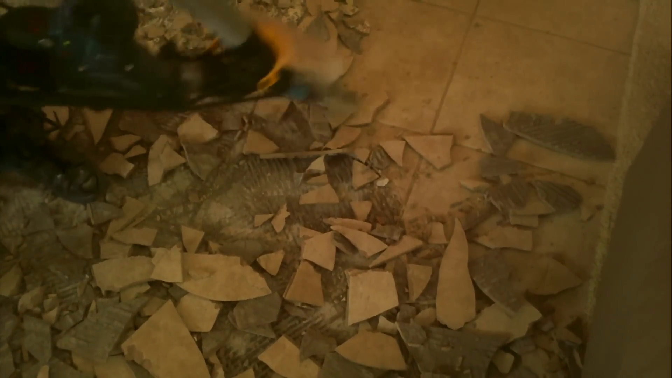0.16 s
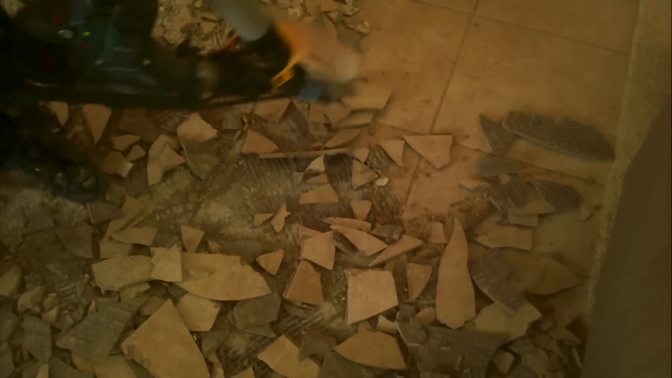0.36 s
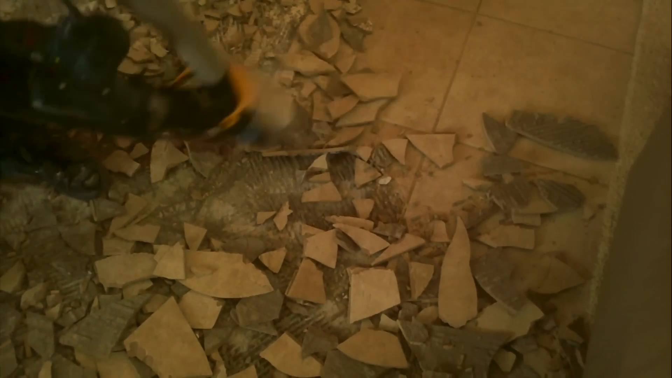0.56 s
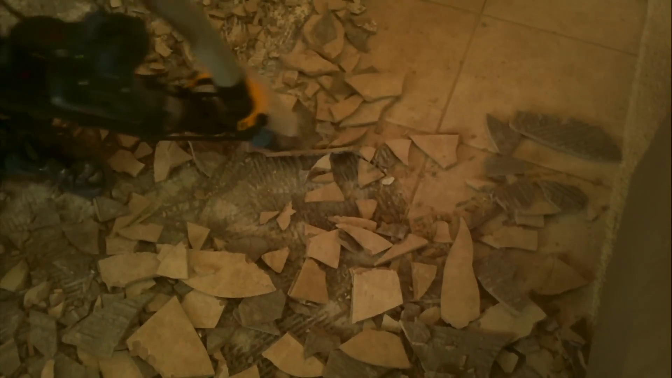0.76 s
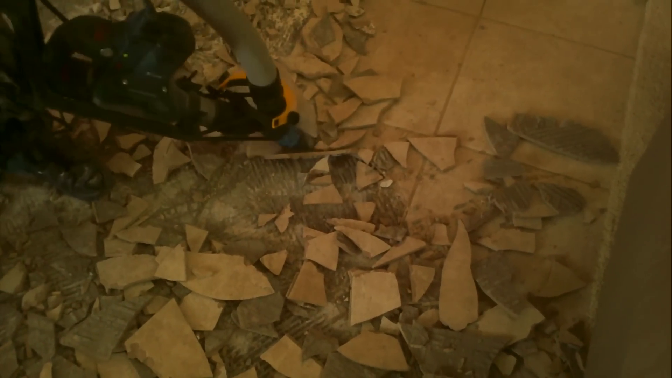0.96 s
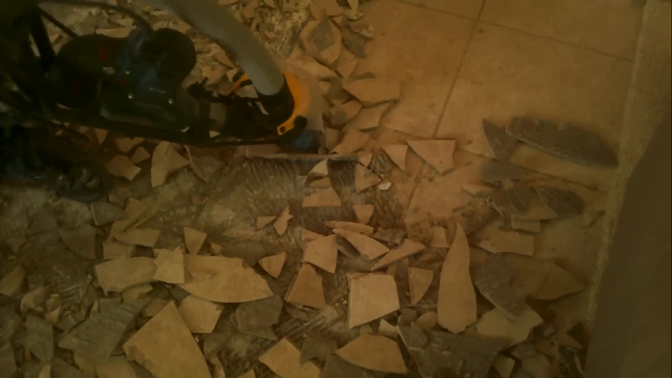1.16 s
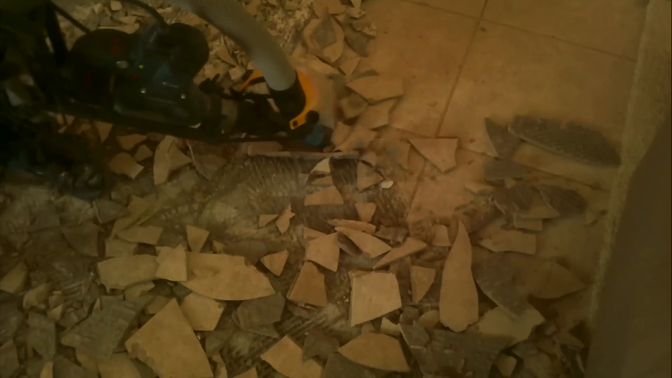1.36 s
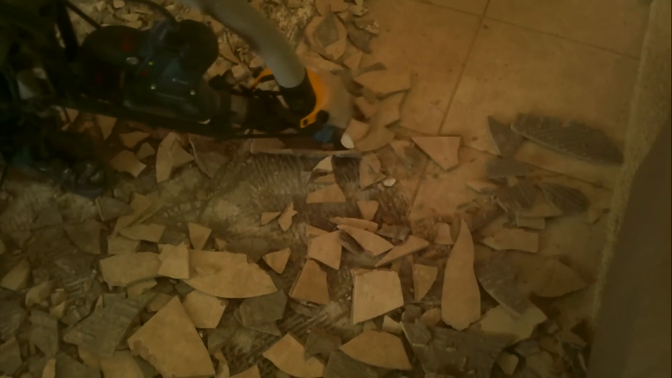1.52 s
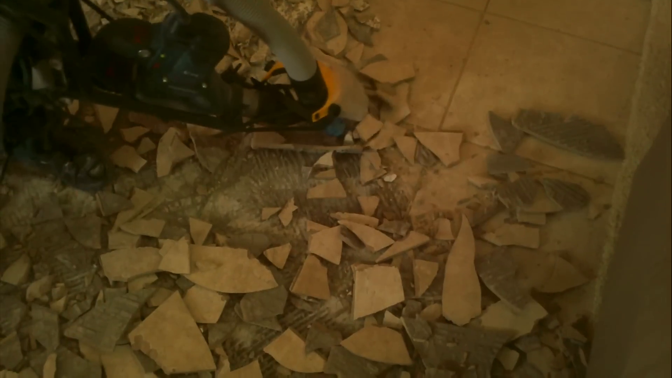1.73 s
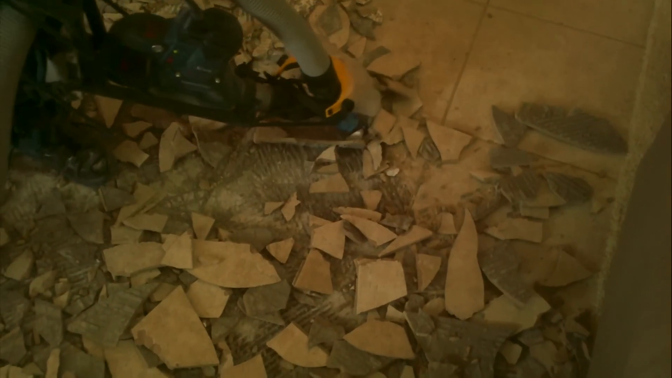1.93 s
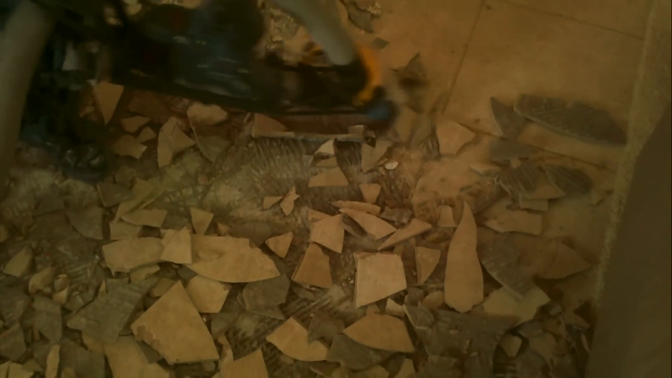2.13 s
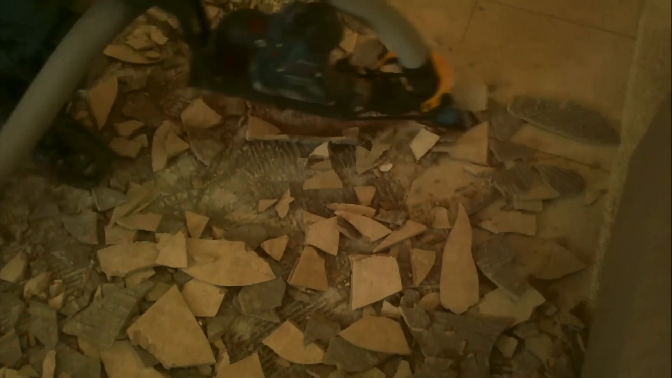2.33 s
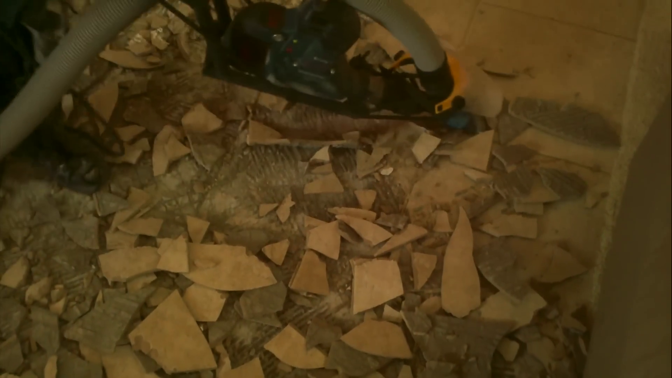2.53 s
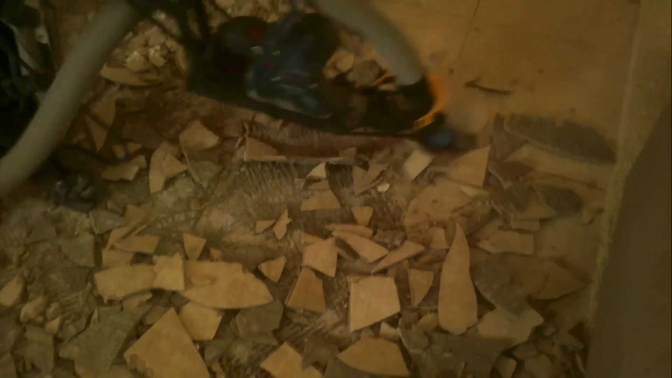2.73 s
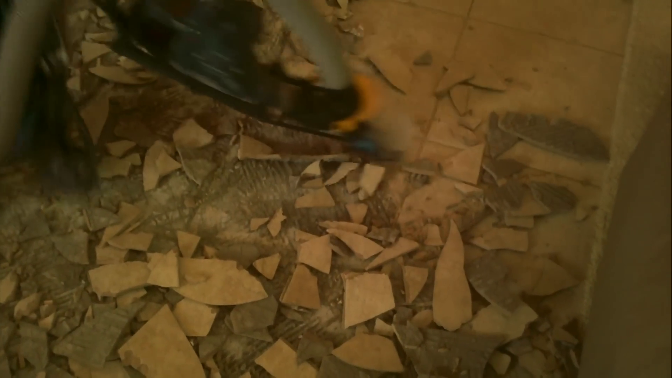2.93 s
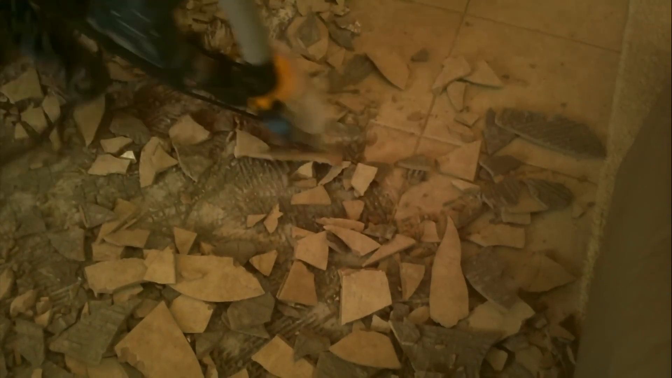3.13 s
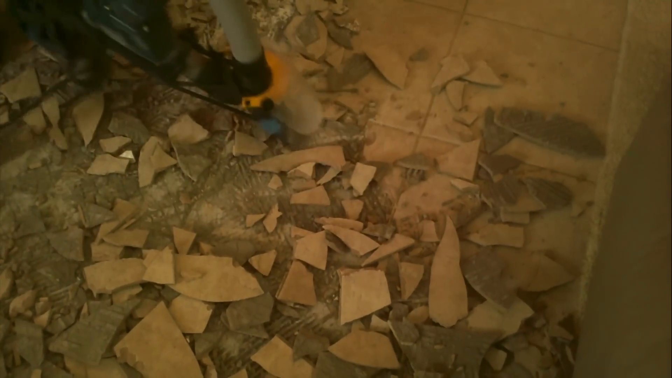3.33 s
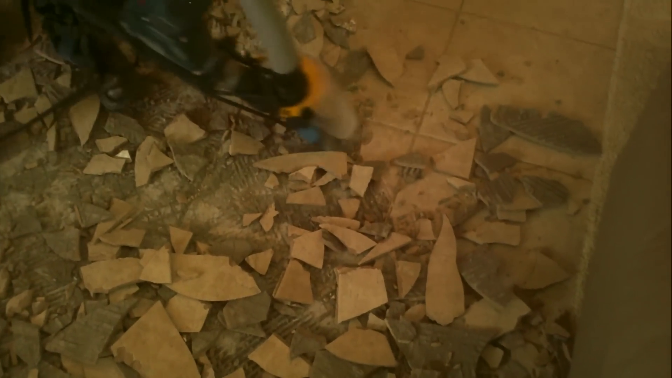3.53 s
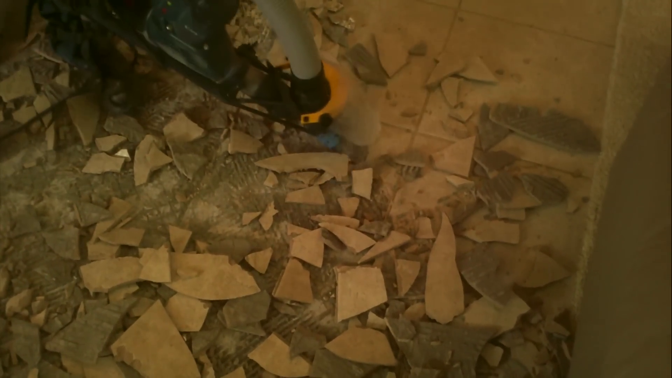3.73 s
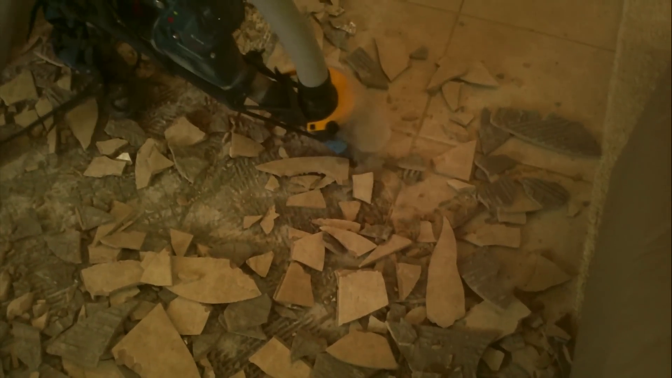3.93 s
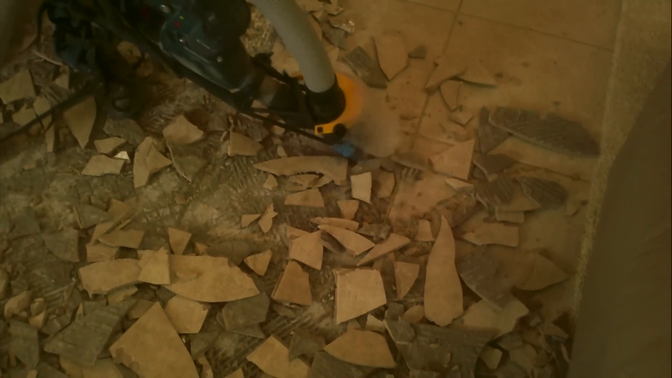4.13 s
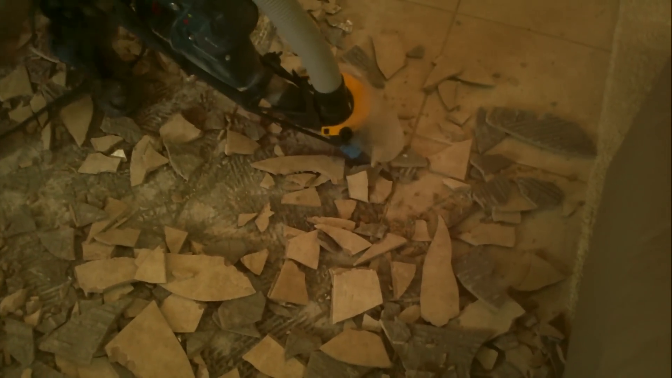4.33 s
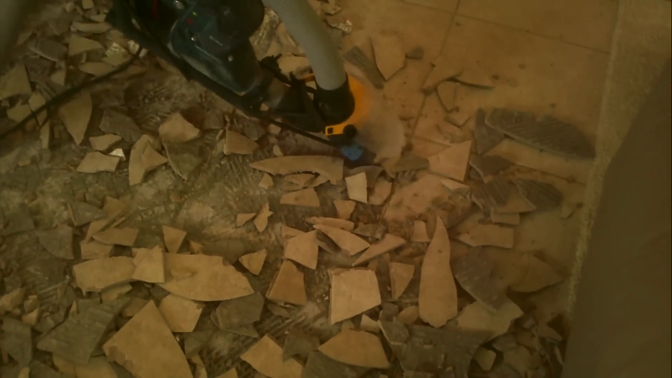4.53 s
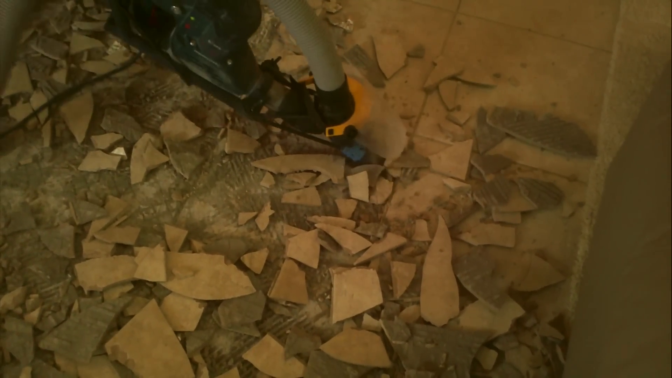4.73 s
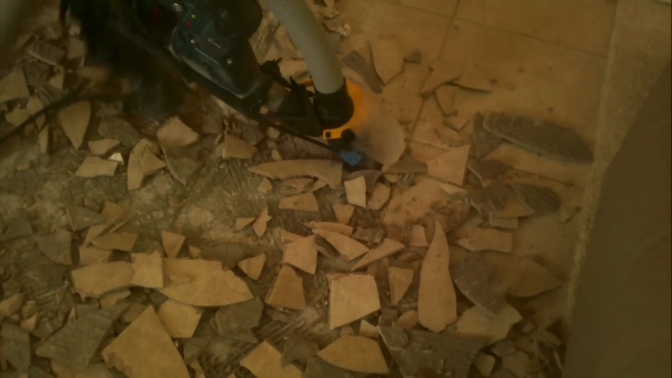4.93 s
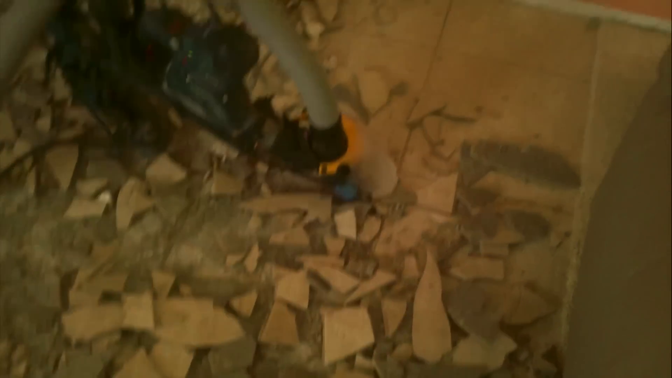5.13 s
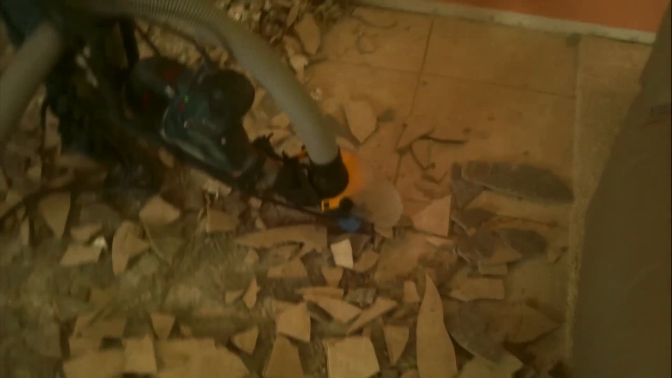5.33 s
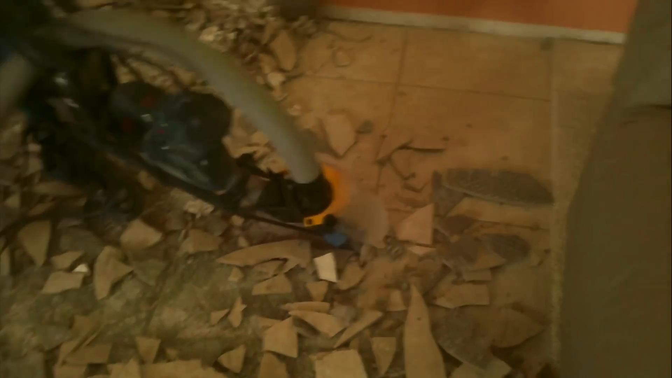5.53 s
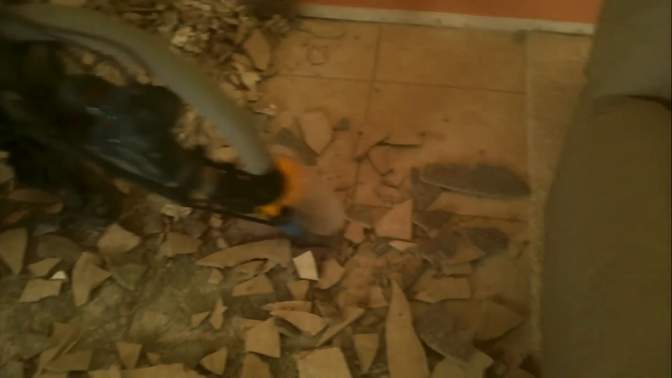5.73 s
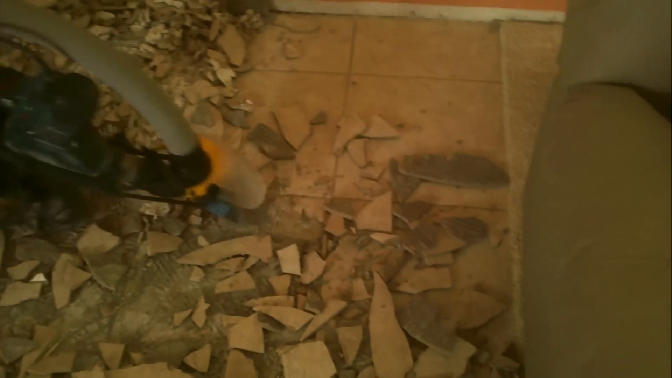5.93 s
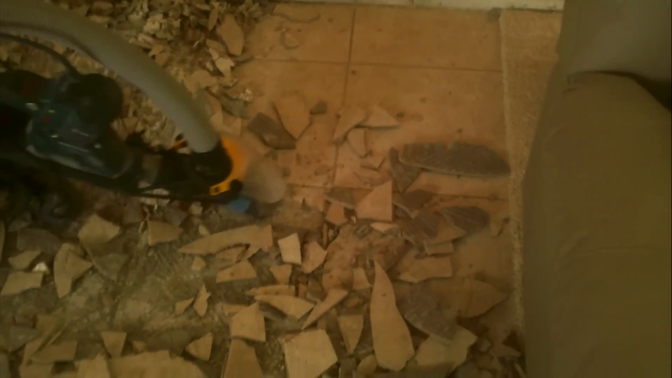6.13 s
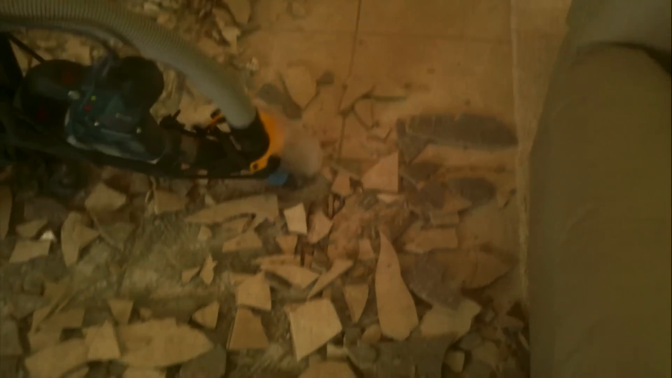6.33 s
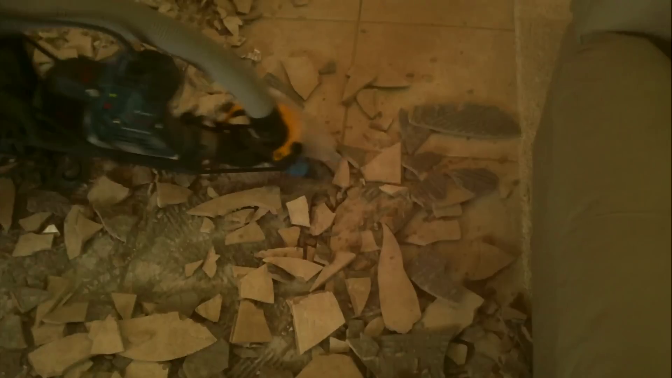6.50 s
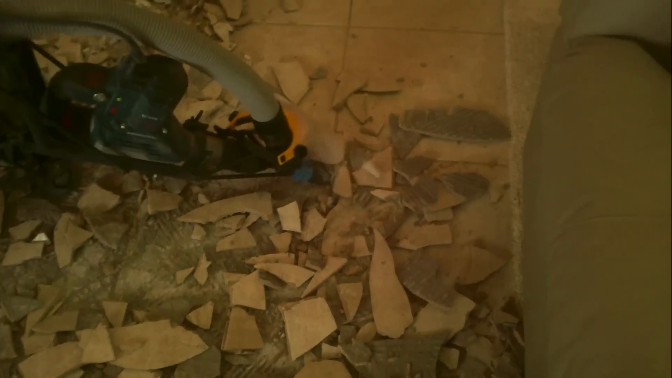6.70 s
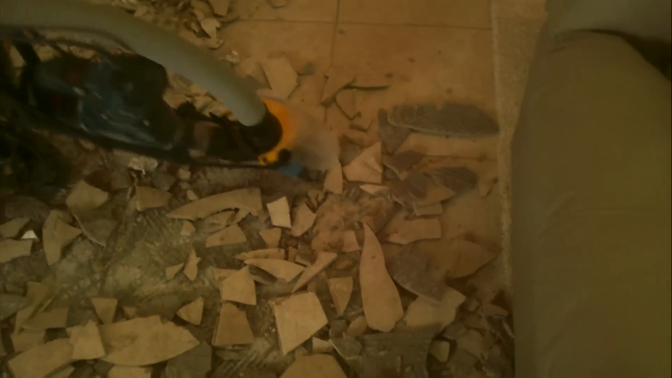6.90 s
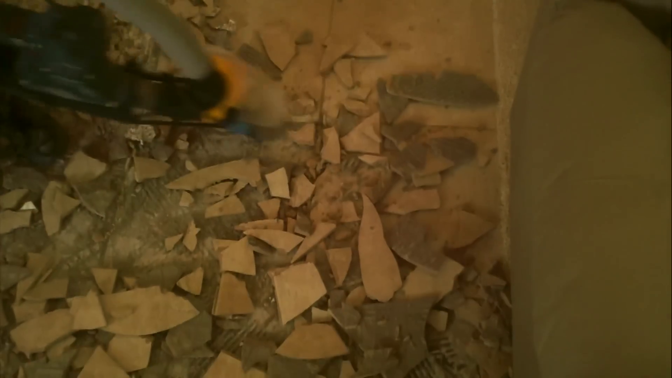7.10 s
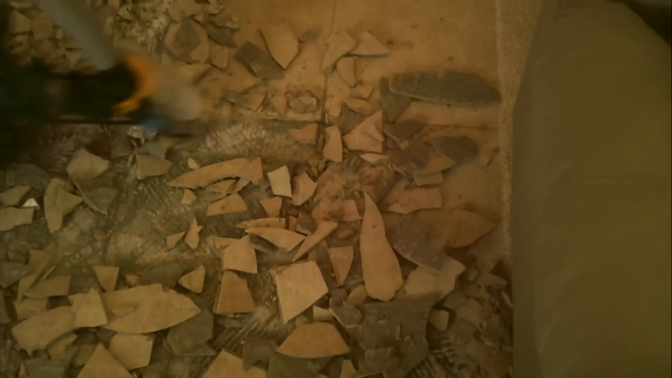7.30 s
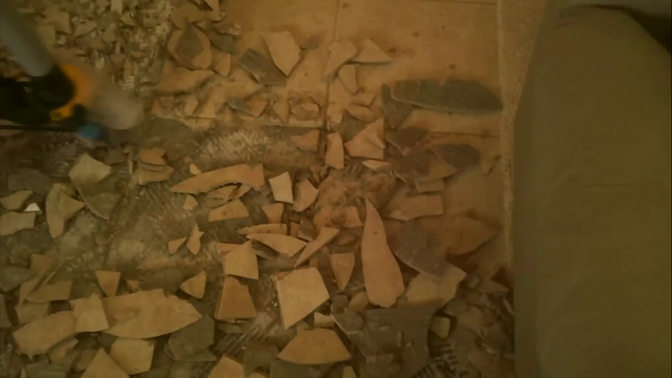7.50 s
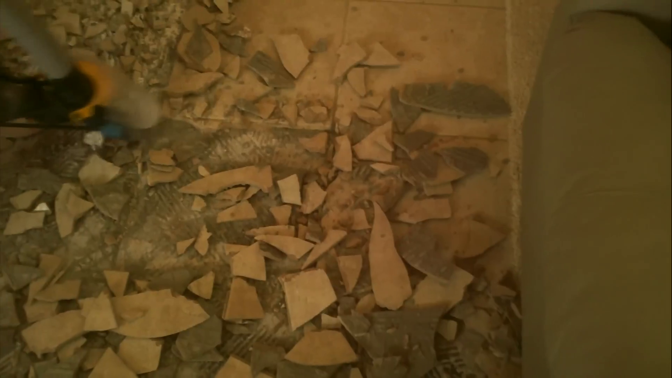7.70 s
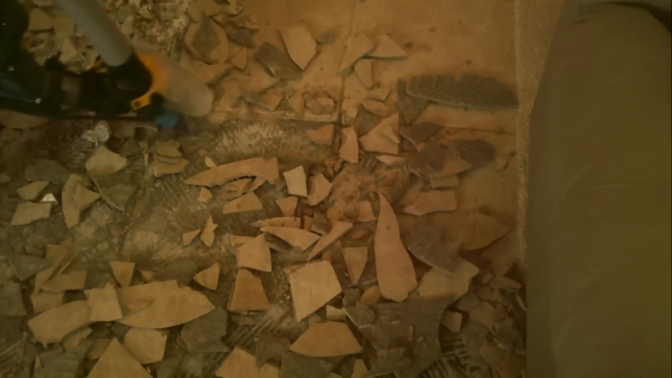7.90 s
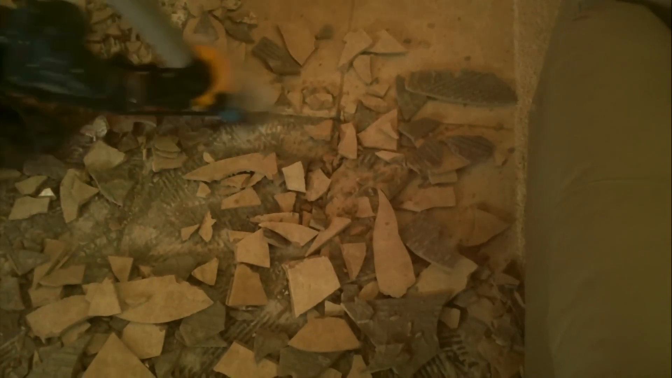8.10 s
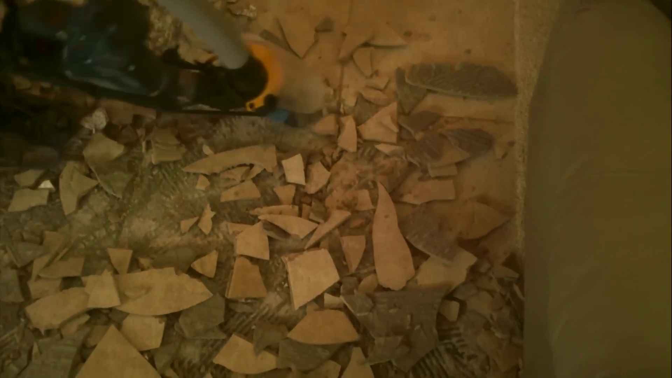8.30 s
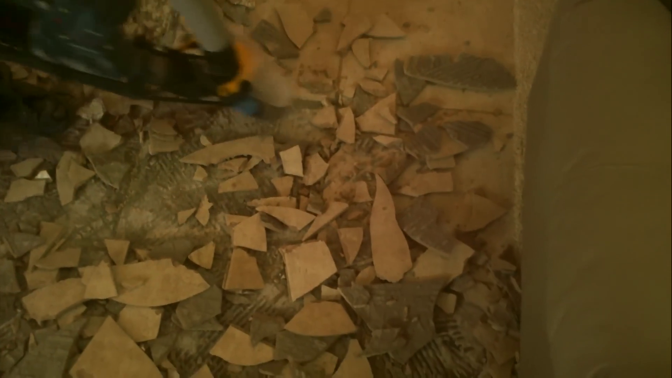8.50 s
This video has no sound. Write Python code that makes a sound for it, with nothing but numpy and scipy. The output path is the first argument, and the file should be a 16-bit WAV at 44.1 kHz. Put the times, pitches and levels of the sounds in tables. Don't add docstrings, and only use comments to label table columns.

```python
import sys
import numpy as np
from scipy import signal
from scipy.io import wavfile
from scipy.ndimage import uniform_filter1d

SR = 44100
rng = np.random.default_rng(int(sys.argv[2]) if len(sys.argv) > 2 else 0)


def volts_from_db(level):
    exponent = np.asarray(level, float) / 20
    return 10 ** exponent


def master_out(mix):
    frames = np.transpose(np.atleast_2d(mix))
    ceiling = np.clip(frames, -1, 1)
    pcm = np.round(ceiling * 32767).astype(np.int16)
    wavfile.write(sys.argv[1], SR, pcm)


N = 377055

# (first blow [s], end [s])
BURSTS = [
    (.8005, 2.3),
    (3.3695, 4.78),
    (5.0235, 5.76),
    (6.1235, 7.06),
    (7.8025, 8.4),
]
# (first blow [dB], rise [s], held level [dB], lifted at [s])
STROKES = [
    (-19, 0.13, -14, 2.148),
    (-19.5, .17, -13.6, 4.635),
    (-15.5, 0.35, -13.5, 5.625),
    (-17.5, 0.12, -13.5, 6.905),
    (-13.5, .1, -14, 8.215),
]
# (time [s], half length [s], shank [dB], free ring [dB], force [dB])
SKIDS = [(1.0, 0.066, 0, 2, 0.2), (1.413, 0.044, 5, 7, -.4), (1.64, 0.087, 4, -10, 0),
         (1.9, 0.13, 1.5, -7, 0.2), (2.1, 0.025, -1, 0, 3), (3.44, 0.11, 6, 8.5, -.3),
         (3.85, .15, -2.0, -5.5, -0.5), (4.242, .06, 0, 6.5, -0.7), (4.6, .06, 2.5, -2.5, 1.5),
         (5.11, 0.12, 1, 7, 0), (5.39, 0.087, -8, 2.5, .4), (6.68, .06, -2, 0, 0.2),
         (6.803, 0.011, 1, -3.0, -2), (8.085, .015, -6, .5, -1), (8.15, 0.043, 6, 0.5, .4),
         (8.236, 0.026, 12.5, 4.0, -0.7)]


def rms_one(x):
    return x / np.sqrt(np.mean(x ** 2) + 1e-20)


def in_time(tables):
    rows = np.concatenate(tables)
    return [np.interp(np.arange(N) / SR, rows[:, 0], column) for column in rows.T[1:]]


def during(spans):
    t = np.arange(N) / SR
    return sum((t >= a) & (t <= b) for a, b in spans)


def passing_db(rows, column):
    t = np.arange(N) / SR
    return sum(row[column] * np.exp(-((t - row[0]) / row[1]) ** 2) for row in rows)


def drift(rate_hz):
    r = np.exp(-80 * np.pi * rate_hz / SR)
    white = rng.standard_normal(N // 40 + 2002)
    slow = signal.lfilter([1], [1, -2 * r, r * r], white)[2000:]
    return np.interp(np.arange(N) / 40, np.arange(len(slow)), rms_one(slow))


def ring(x, hz, t60_s):
    r, w = volts_from_db(-60 / (t60_s * SR)), 2 * np.pi * hz / SR
    return signal.lfilter([0, np.sin(w)], [1, -2 * r * np.cos(w), r * r], x + 1e-18)


def tone(hz, width_hz):
    phase = 2 * np.pi * np.cumsum(hz + width_hz * drift(23.5)) / SR
    return np.sqrt(2) * np.sin(phase)


def coloured(spectrum, patchy_db):
    out, white = 0, rng.standard_normal((2, N))
    edges_hz = 70 * 2 ** np.arange(0, 8.1, 1 / 4)
    hz, level_db = np.transpose(spectrum)
    for k, (low, high) in enumerate(zip(edges_hz, edges_hz[1:])):
        sos = signal.butter(2, [low, high], "band", fs=SR, output="sos")
        band_db = np.interp(np.log(low * high) / 2, np.log(hz), level_db) + patchy_db * drift(5.2)
        out = out + signal.sosfilt(sos, white[k % 2]) * volts_from_db(band_db)
    return rms_one(out)


def dying(clicks, tau_s):
    return signal.lfilter([1], [1, -np.exp(-1 / (tau_s * SR))], clicks + 1e-18)


def hammer():
    # (time [s], push as floor shock [dB], depth as contact re ring [dB])
    tip = [
        [(.81, -57, -4), (.97, -22, -7), (1.18, -20.5, -8), (1.26, -31, -2), (1.33, -23, -7.5),
         (1.65, -26.5, -8), (2.1, -18, -5.5), (2.17, -60, -5.5)],
        [(3.38, -58, -7), (3.52, -19.5, -8), (3.66, -33.5, -8.5), (3.88, -18.5, -5.5), (3.98, -24, -7),
         (4.2, -25, -9.5), (4.62, -25.5, -6), (4.7, -58, -15)],
        [(5.03, -30, -12), (5.1, -29, -3), (5.39, -21, -8), (5.6, -23.5, -8), (5.67, -50, -5)],
        [(6.13, -64, -9), (6.22, -24.5, -6.5), (6.69, -19.5, -7.5), (6.77, -33, -5), (6.81, -45, -7),
         (6.93, -57, -12)],
        [(7.81, -33, -4), (7.84, -18.5, -3.5), (8.0, -14.5, -8), (8.07, -48, -7), (8.14, -33, -1),
         (8.25, -40, -10), (8.29, -60, -13)],
    ]
    # (frequency [Hz], level [dB], t60 [s])
    chisel = [(8682, -2.5, 0.016), (8840, -3.5, 0.03), (9164, -2, 0.021), (9326, -5, 0.0071),
              (8433, -4.5, 0.018)]
    contact = [(6354, -7, 0.052), (7120, -4, 0.0078), (7636, 1, 0.014), (8090, 1.5, 0.011),
               (5950, -12, 0.11)]
    shank = [(10177, -3, .011), (10645, -3, 0.0066), (11660, -13.5, 0.019), (12020, -9, 0.03)]
    overdrive, knee_db = 1.64, -17

    ring_db, (shock_db, contact_db) = stroke_db(), in_time(tip)
    depth_db, push_db = contact_db + 7, shock_db + 26
    shank_db = -6.5 + 0.66 * depth_db + passing_db(SKIDS, column=2) + 1.8 * drift(7.9)
    free_db = -6 - 0.048 * depth_db - 0.033 * push_db + passing_db(SKIDS, column=3) + 1.13 * drift(4.9)
    shock_db = shock_db + 1.8 * drift(29.0)
    on = during(BURSTS)
    force = on * volts_from_db(ring_db + overdrive * np.maximum(ring_db - knee_db, 0))

    clicks = blows(jitter_s=.0012, spread_db=3.5)
    bite = np.clip((shock_db + 37) / 25, 0, 1)
    rebounds = .45 * bite * np.roll(clicks, round(.0101 * SR))
    rattle = dying(clicks + rebounds, .009) + .19 + .22 * bite

    steel = 0.85 * steel_modes(rattle, chisel)
    steel = steel + volts_from_db(free_db + 1.5) * bell(rattle)
    steel = steel + volts_from_db(contact_db + 1.5) * steel_modes(rattle, contact)
    steel = steel + volts_from_db(shank_db - 1.35) * steel_modes(rattle, shank)
    sound = force * (steel + breaking_tile(rattle, push_db)) + loose_tile(rattle)
    return sound, jolts(clicks, on * volts_from_db(shock_db - 3))


def stroke_db():
    fade_db_per_s2, flicker_db = 760, 0.43
    t, out = np.arange(N) / SR, np.zeros(N)
    for (a, b), (first_db, rise_s, held_db, lift_s) in zip(BURSTS, STROKES):
        level_db = np.interp(t, [a, a + rise_s], [first_db, held_db])
        level_db = level_db - fade_db_per_s2 * np.maximum(t - lift_s, 0) ** 2
        out = np.where(t >= a, level_db, out)
    return out + passing_db(SKIDS, column=4) + flicker_db * drift(6.1)


def blows(jitter_s, spread_db):
    blows_per_s = [48.85, 49.64, 49.51, 49.16, 49.9]
    first_blow_spreads, idling_db_per_s = 0.31, 44
    clicks = np.zeros(N)
    for (a, b), rate, (_, _, _, lift_s) in zip(BURSTS, blows_per_s, STROKES):
        at_s = np.arange(a, b, 1 / rate) + .001
        luck = rng.standard_normal((100, 2))[:len(at_s)]
        luck[0] = 0, first_blow_spreads
        force_db = spread_db * luck[:, 1] - idling_db_per_s * np.maximum(at_s - lift_s, 0)
        clicks[((at_s + jitter_s * luck[:, 0]) * SR).astype(int)] = volts_from_db(force_db)
    return clicks


def steel_modes(rattle, modes):
    out = 0
    for hz, db, t60_s in modes:
        level = volts_from_db(db + 2.37 * drift(3.45)) / np.sqrt(t60_s)
        out = out + level * ring(rattle * rng.standard_normal(N), hz, t60_s)
    return rms_one(out)


def bell(rattle):
    bell_hz, t60_s, wander_hz = 8935, .045, 38
    kicks = rattle * (rng.standard_normal(N) + 1j * rng.standard_normal(N))
    envelope = signal.lfilter([1], [1, -volts_from_db(-60 / (t60_s * SR))], kicks)
    phase = 2 * np.pi * np.cumsum(bell_hz + wander_hz * drift(4)) / SR
    return rms_one(np.real(envelope * np.exp(1j * phase)))


def breaking_tile(rattle, push_db):
    # (frequency [Hz], density [dB per Hz])
    spectrum = [(120, -67), (200, -28.5), (1440, -13), (1900, -10), (4990, -9), (6810, -8), (8800, 1),
                (9640, -12), (15800, -10.5)]
    level = volts_from_db(-4.5 + 0.019 * np.minimum(push_db, 0))
    return level * rms_one(rattle) * coloured(spectrum, patchy_db=0.9)


def loose_tile(rattle):
    # (from [s], to [s], frequency [Hz], level [dB], t60 [s])
    singing = [
        (0.897, 1.0, 1870, -28.5, 0.11),
        (1.08, 1.332, 3500, -25, 0.086),
        (1.55, 1.734, 1940, -25, 0.064),
        (1.82, 1.98, 6000, -24, 0.1),
        (2.034, 2.09, 1530, -23, 0.031),
        (4.287, 4.553, 3470, -24.5, 0.055),
        (5.27, 5.33, 4520, -27, .06),
        (5.33, 5.37, 2110, -12.5, 0.022),
    ]
    noise, out = rattle * rng.standard_normal(N), 0
    for a, b, hz, db, t60_s in singing:
        gate = uniform_filter1d(1. * during([(a, b)]), size=1500)
        out = out + volts_from_db(db - 2.0) * rms_one(ring(noise, hz, t60_s)) * gate
    return out


def jolts(clicks, shock):
    # (time [s], peak [dB], direction [+1/-1])
    heavy_blows = [(0.985, 3, 1), (1.091, -2, 1), (1.314, -4, 1), (1.398, -4, 1), (1.557, -3, 1),
                   (1.639, 0, -1), (1.738, 5, 1), (1.758, -4, 1), (2.016, -1, 1), (2.114, 3, -1),
                   (3.512, -1, 1), (3.596, -1, 1), (3.74, -1, 1), (3.883, -7, 1), (3.924, 4, -1),
                   (3.965, -1, 1), (4.329, 2, 1), (5.306, 2, 1), (5.369, 4.5, -1), (5.517, 1, -1),
                   (5.58, 1, -1), (6.283, 1, 1), (6.348, -1, 1), (6.429, 2, -1), (6.454, 5, 1),
                   (6.574, -7, 1), (6.698, -3, 1), (6.759, 0, 1), (7.844, 2, 1), (7.942, 0, 1)]
    forward_share = 0.95
    direction = np.sign(forward_share - rng.random(N))
    pushes = 3.5 * shock * np.sqrt(clicks) * rng.uniform(0.33, 1.7, N) * direction
    for s, db, way in heavy_blows:
        pushes[round((s - .009) * SR):round((s + .009) * SR)] = 0
        pushes[round(s * SR)] = volts_from_db(db - 2.5) * np.sign(way)
    lag_s, point = np.arange(-300, 301) / SR, rng.random(N)
    pointed = signal.fftconvolve(pushes * point, 1.67 * np.exp(-np.abs(lag_s) / 0.00011), "same")
    blunt = signal.fftconvolve(pushes * (1 - point), 0.37 * np.exp(-np.abs(lag_s) / 0.0008), "same")
    rumble = (dying(clicks, 0.0024) + 0.12) * rng.standard_normal(N)
    rumble = rms_one(signal.sosfilt(signal.butter(1, 70, fs=SR, output="sos"), rumble))
    return 0.57 * shock * rumble + pointed + blunt


def motor():
    # (heard from [s], to [s], fastest at [s], overshoot [Hz])
    races = [
        (0, .9, -1.0, 0.0),
        (2.2, 3.4, 2.3, 372),
        (4.66, 5.05, 4.78, 328),
        (5.68, 6.14, 5.79, 292),
        (6.92, 7.82, 7.02, 278),
        (8.2, 8.55, 8.34, 128),
    ]
    # (time [s], whine level [dB], housing level [dB])
    turn = [(0, -42, -40), (.25, -31.5, -30), (.45, -37, -38), (.85, -36, -38), (2.3, -35, -30.5),
            (2.44, -42, -35), (2.66, -34.5, -42), (2.86, -42, -40), (3.06, -33.5, -33), (3.35, -40, -45.5),
            (4.7, -37, -31), (5.0, -37, -34), (5.8, -33.5, -30), (6.1, -38, -36), (7.03, -36, -33),
            (7.14, -39, -36.5), (7.75, -29.5, -32), (8.4, -34, -31)]
    # (time [s], half length [s], change [dB])
    screened = [(.47, 0.046, -6), (2.22, 0.032, -6), (5.7, .04, -5), (8.54, 0.047, -5), (.72, .07, -7),
                (2.43, .04, -8), (2.86, .06, -7), (3.28, 0.063, -6), (4.77, .025, -7), (5.93, .03, -8),
                (6.1, .05, -9), (7.14, .06, -10), (7.37, 0.018, -3), (7.63, 0.028, -15), (8.38, 0.023, -11)]
    # (multiple of whine [ratio], level [dB], re whine above ratio 0.5 and re housing below, width
    # [Hz])
    motor_tones = [(.28, -12.5, 35), (.413, -7.5, 22), (.708, -14, 9.1), (1.353, -12, 10.6)]
    idle_hz, race_s, settle_s = 5298, .27, .31

    t, hz = np.arange(N) / SR, np.full(N, 1. * idle_hz)
    for a, b, top_s, over_hz in races:
        width_s = np.where(t < top_s, race_s, settle_s)
        race_hz = over_hz * np.exp(-((t - top_s) / width_s) ** 2)
        hz = np.where(t >= a - .05, idle_hz + race_hz, hz)
    whine_db, housing_db = in_time([turn])
    free = uniform_filter1d(1. * during([row[:2] for row in races]), size=900)
    fellows = 0
    for ratio, db, width_hz in motor_tones:
        base_db = whine_db if ratio > .5 else housing_db
        fellows = fellows + volts_from_db(base_db + db + 5.0 + 1.8 * drift(12)) * tone(ratio * hz, width_hz)
    whine_db = whine_db + 1.5 + passing_db(screened, column=2) + 2.8 * drift(16)
    return free * (volts_from_db(whine_db) * tone(hz, 2.3) + fellows)


def shards():
    # (time [s], peak [dB], frequency [Hz], t60 [s])
    landings = [(.1495, -15, 6600, 0.066), (0.15, -19, 3180, 0.053), (0.168, -11, 4440, 0.0099),
                (0.172, -12, 6700, .03), (.169, -21, 2300, 0.089), (0.2274, -11, 7400, 0.009),
                (0.567, -11.5, 5800, 0.0059), (.571, -14, 8560, 0.011), (2.98, -16, 15000, .04),
                (3.17, -21, 10500, 0.029), (4.869, -18, 6900, 0.031), (4.892, -16, 6570, .03),
                (4.9128, -8.5, 5950, 0.021), (5.006, -14, 8950, 0.1), (7.76, -19, 9000, .08),
                (5.007, -28, 7200, 0.019), (6.072, -12, 8850, 0.04), (6.085, -26, 7100, 0.0087)]
    out, length = np.zeros(N), 4000
    sos = signal.butter(2, [2000, 10500], "band", fs=SR, output="sos")
    for s, db, hz, t60_s in landings:
        at = round(s * SR)
        tick = rng.standard_normal(length) * np.exp(-np.arange(length) / (0.0028 * SR))
        body = ring(tick, hz, t60_s)
        bright = signal.sosfilt(sos, tick)
        out[at:at + length] += volts_from_db(db) * (body / np.abs(body).max() + 0.71 * bright)
    return out


def vacuum():
    # (frequency [Hz], level [dB])
    air = [(120, -26.5), (250, -10.5), (500, -5), (1100, -4), (1500, 3.0), (2300, 4.5), (3000, -0.5),
           (4100, 4), (4900, -1.1), (6500, 4), (9500, 2), (11000, 3.5), (12800, -17.5), (15200, -7.5)]
    # (frequency [Hz], level [dB], width [Hz])
    fan = [(323, -47, 2.5), (5605, -46, 3), (6537, -48, 5)]
    hiss_db, dust_db, dust_clears_s = -24, 1, 0.35
    t = np.arange(N) / SR
    dust = sum((t > b) * np.exp(-np.abs(t - b) / dust_clears_s) for a, b in BURSTS)
    hiss = volts_from_db(hiss_db + dust_db * dust) * coloured(air, patchy_db=1.28)
    tones = sum(volts_from_db(db + 3.5 * drift(11)) * tone(np.full(N, hz), width_hz) for hz, db, width_hz in fan)
    return hiss + tones + hose_grit()


def hose_grit():
    # (time [s], level [dB])
    grit_level = [
        (0, -37),
        (.36, -43),
        (.78, -36),
        (2.4, -42),
        (3.35, -38),
        (4.9, -43),
        (5.95, -28),
        (7.4, -29),
        (8.5, -47),
    ]
    (level_db,) = in_time([grit_level])
    grains_per_s = 260 * volts_from_db(5 * drift(12))
    grains = (rng.random(N) < grains_per_s / SR) * volts_from_db(3.8 * rng.standard_normal(N))
    dealt = rng.integers(0, 12, N)
    pitches_hz = np.geomspace(5900, 9600, 12)
    grit = sum(ring(grains * (dealt == k), hz, t60_s=.014) for k, hz in enumerate(pitches_hz))
    return volts_from_db(level_db) * rms_one(grit)


def boots():
    # (time [s], level [dB])
    thuds = [
        (.61, -44.5),
        (2.78, -48.5),
        (7.299, -55),
    ]
    t = np.arange(N) / SR
    swell = sum(volts_from_db(db) * np.exp(-((t - s) / 0.051) ** 2) for s, db in thuds)
    sos = signal.butter(2, [110, 500], "band", fs=SR, output="sos")
    return swell * rms_one(signal.sosfilt(sos, rng.standard_normal(N)))


def scene():
    steel, shock = hammer()
    return np.array([steel + motor() + shards() + vacuum() + boots(), shock])


def saturate(x, top):
    return top * x / (top ** 8 + x ** 8) ** .125


def roll_off(x):
    return signal.sosfilt(signal.butter(12, 16040, fs=SR, output="sos"), x)


def record(dry):
    air, shock = dry
    capsule = saturate(air, top=0.38)
    mono = saturate(capsule + shock, top=0.56)
    mono = signal.sosfilt(signal.ellip(12, .1, 70, 15690, fs=SR, output="sos"), mono)
    return roll_off(np.array([mono, mono]))


dry = scene()
out = record(dry)
master_out(out)
```